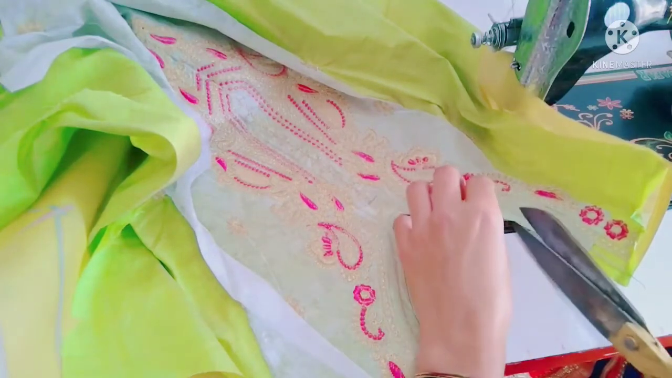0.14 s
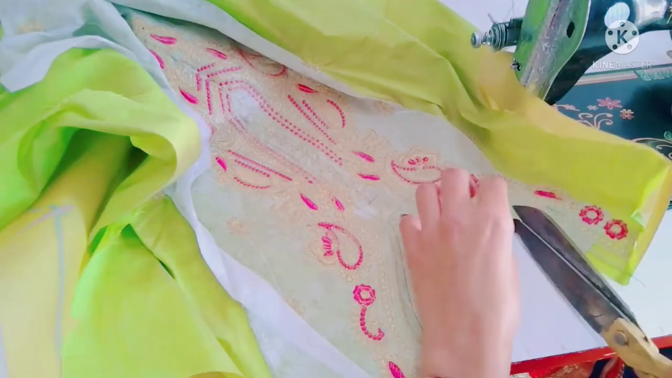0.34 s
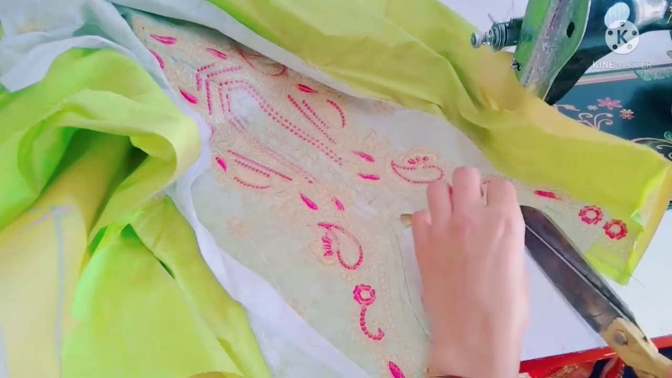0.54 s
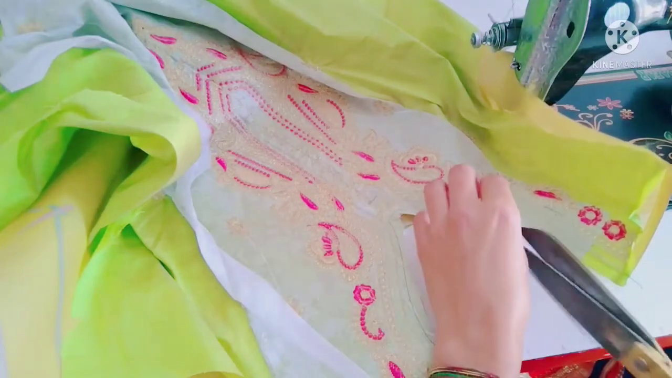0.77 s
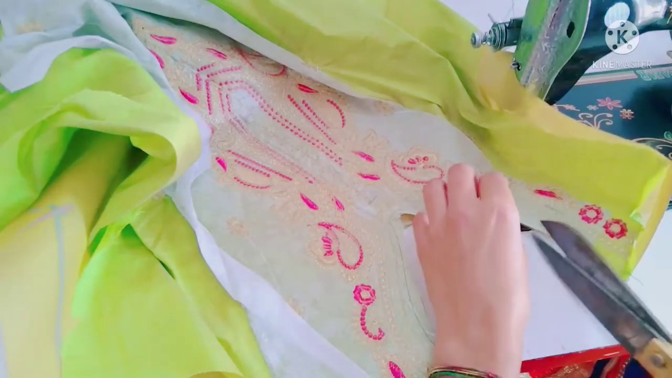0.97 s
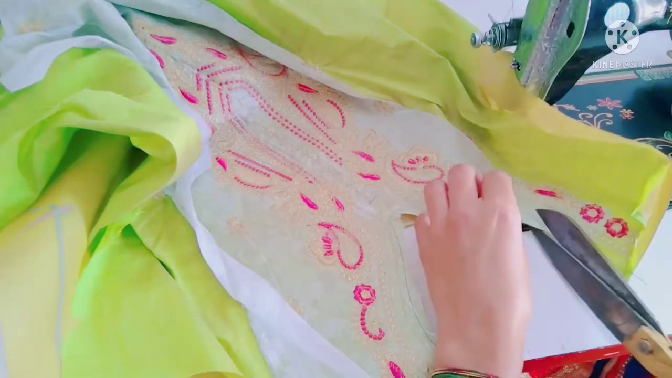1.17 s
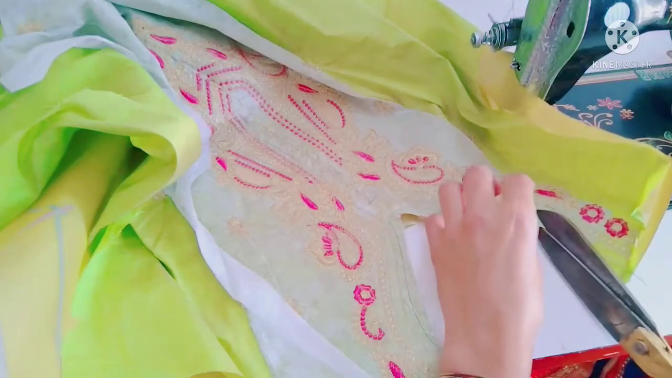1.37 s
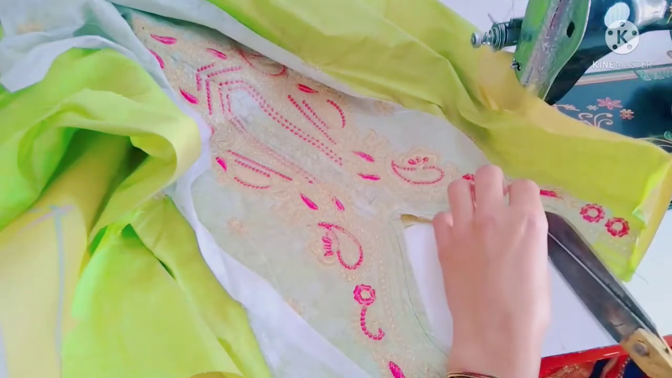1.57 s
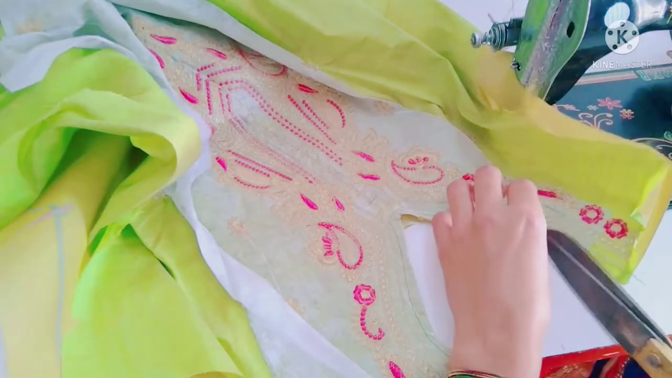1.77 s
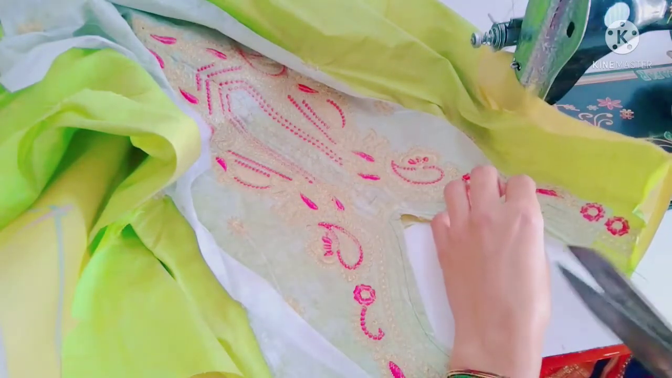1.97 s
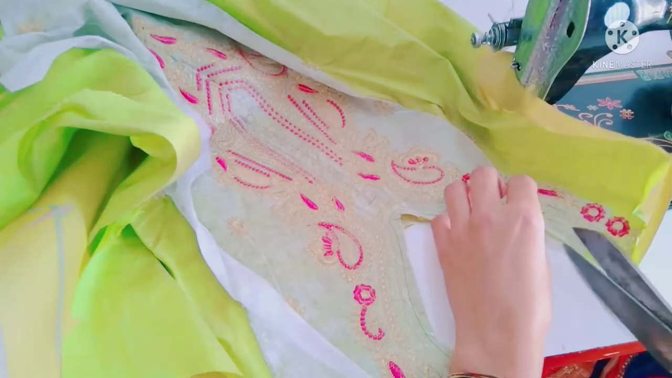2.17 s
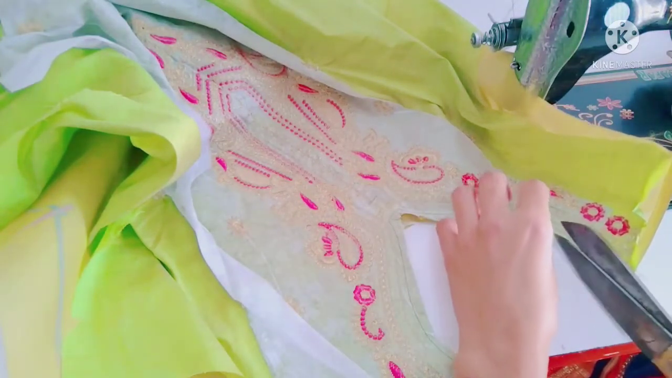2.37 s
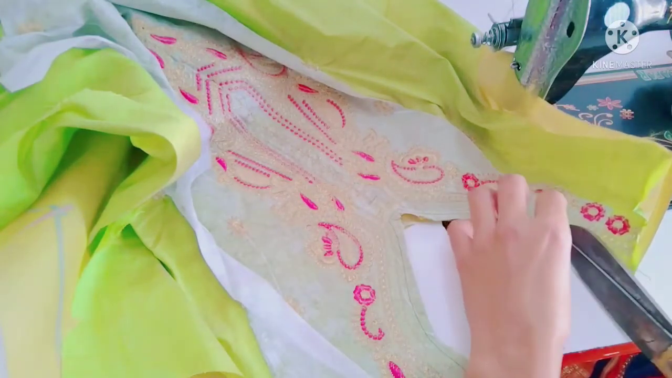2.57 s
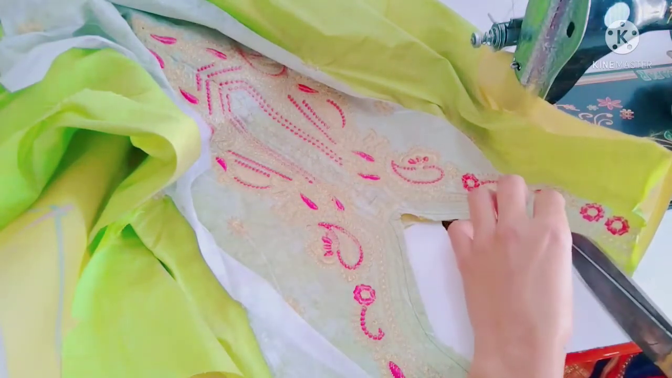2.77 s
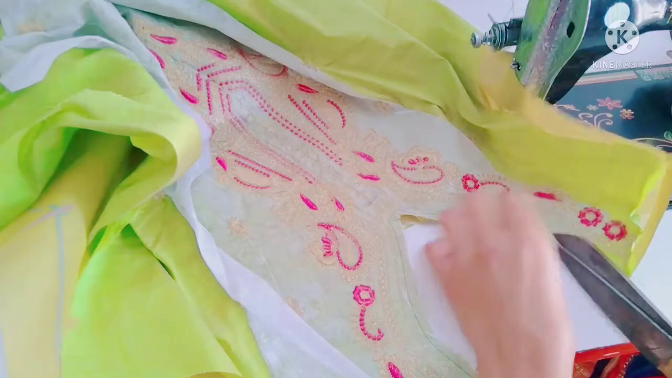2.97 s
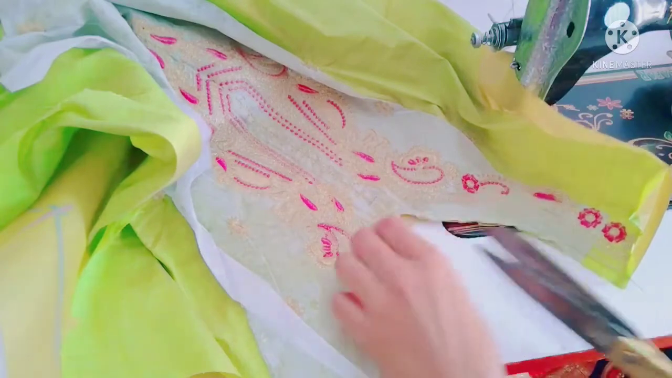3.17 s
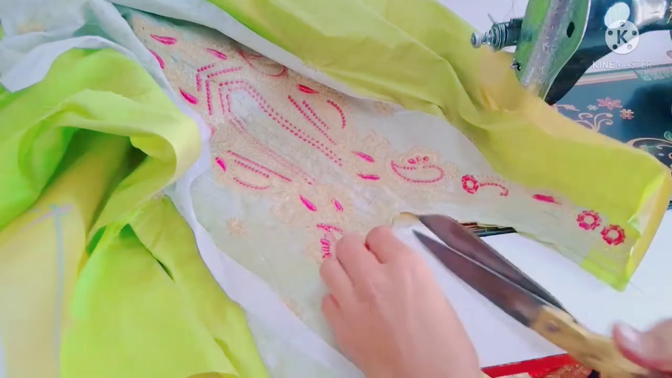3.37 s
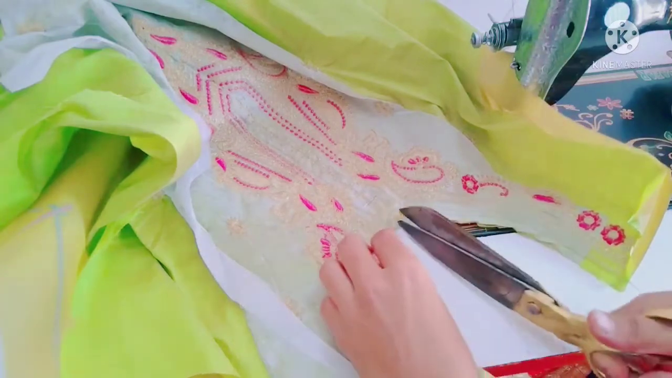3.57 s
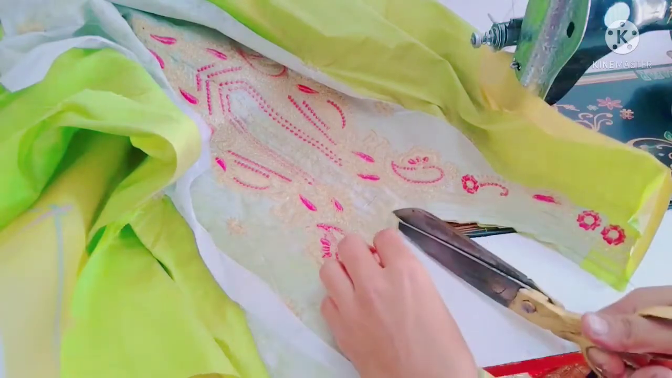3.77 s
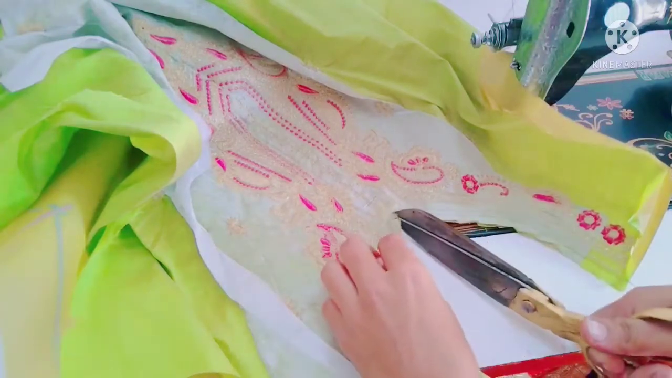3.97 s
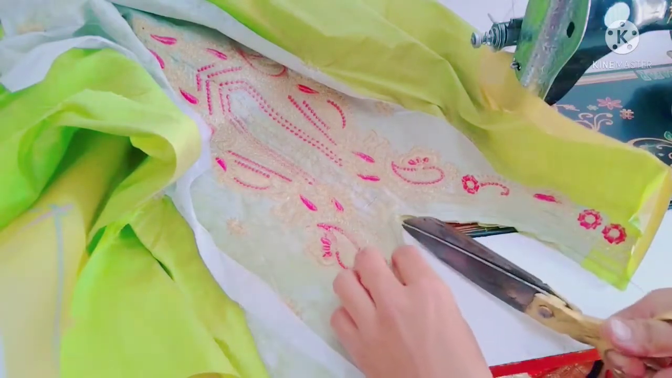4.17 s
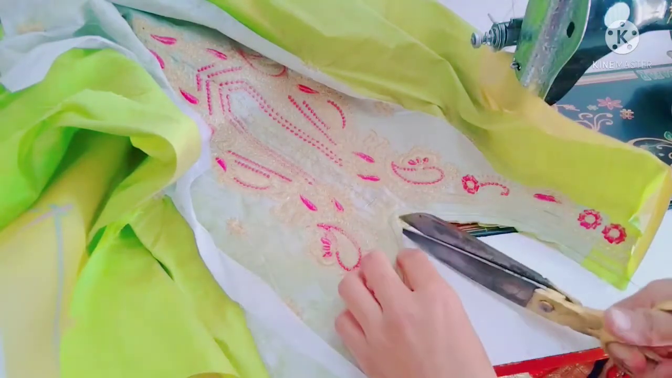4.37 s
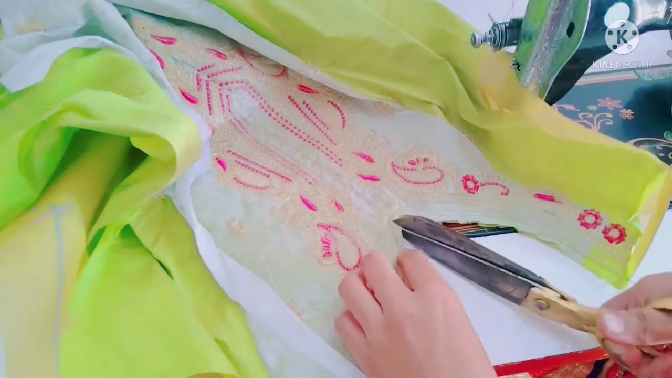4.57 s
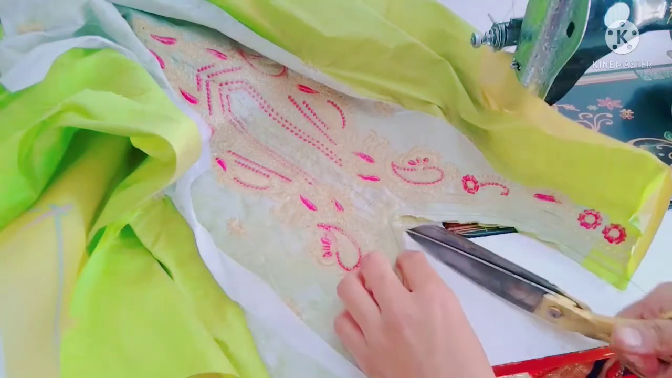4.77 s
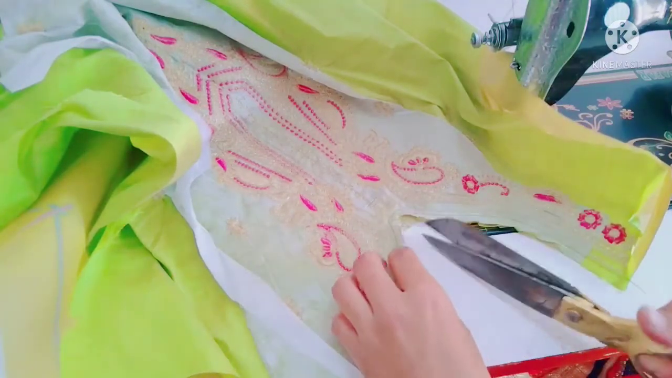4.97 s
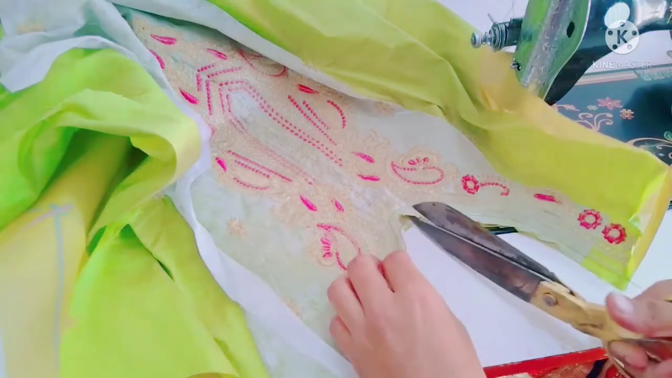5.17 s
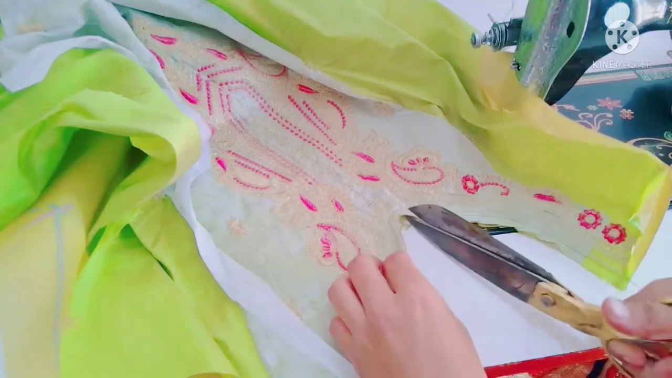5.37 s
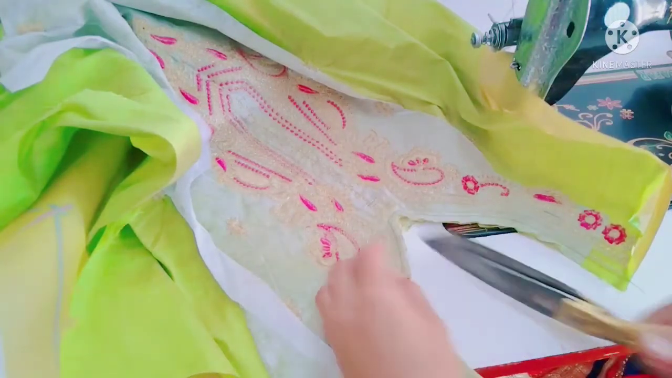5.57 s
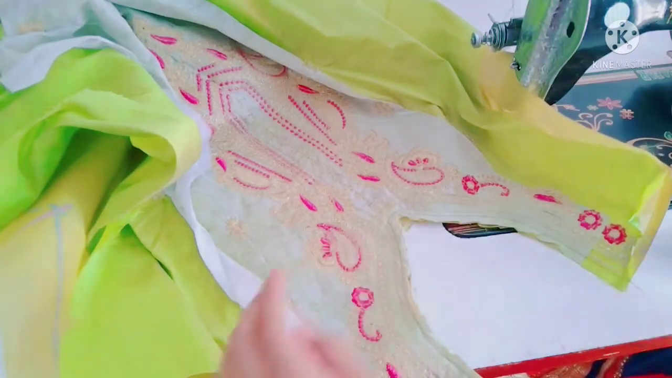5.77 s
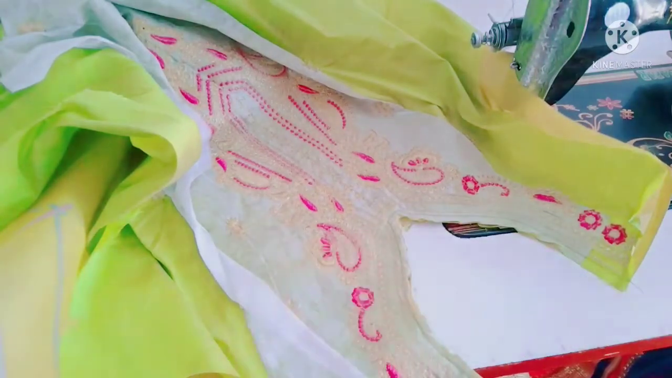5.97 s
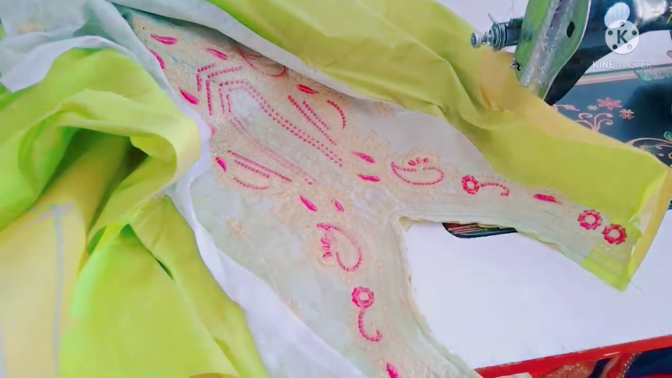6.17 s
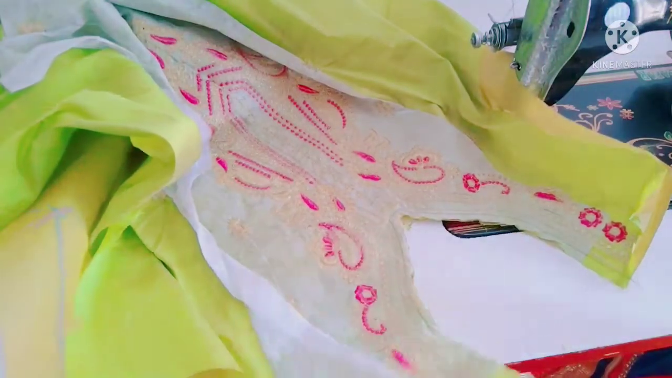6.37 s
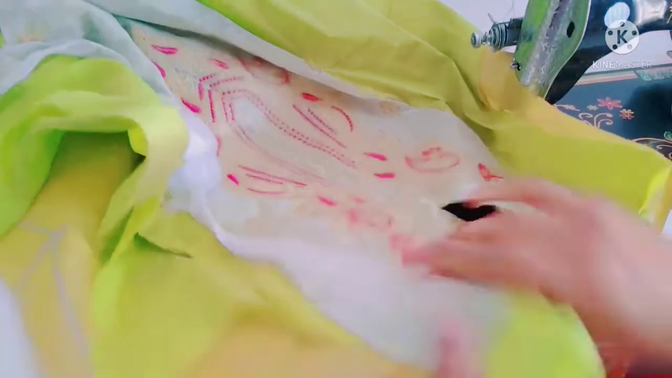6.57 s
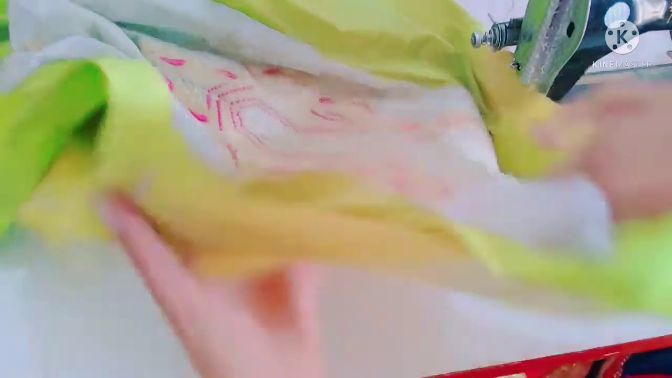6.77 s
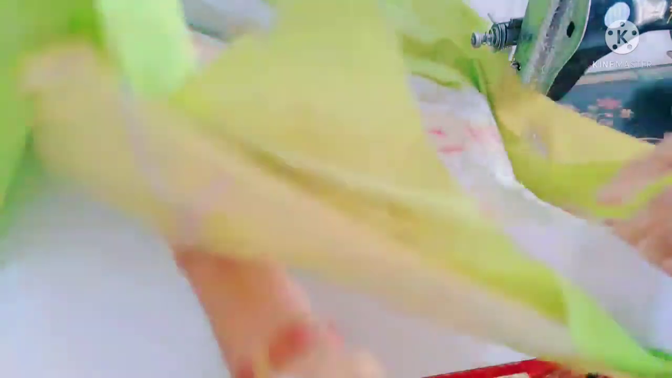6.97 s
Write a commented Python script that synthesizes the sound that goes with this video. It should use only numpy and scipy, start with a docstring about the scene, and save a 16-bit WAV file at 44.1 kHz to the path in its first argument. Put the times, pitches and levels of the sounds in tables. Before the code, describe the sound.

A crisp snip comes almost at once, another after a second, then more at uneven gaps, each a gritty tear and metallic snap with a woody thump. Cloth slides between cuts and something hollow is knocked. Soft birdsong, a faint accelerating motor and passing tones lie behind. Finally the shears clatter down and cloth swishes, all close-miked in a reflective indoor workspace.

```python
"""A rustle of cloth and a tick of steel are heard first; then heavy shears cut cloth on a wooden table in rasping
bursts, snap shut and at last drop and bounce. Something hollow is knocked; outside, a small engine gathers
speed, two birds call and a few faint tones pass. Noise shaped by spectra makes rasp, cloth and air; pushes
excite resonances of table, hollow body and exhaust; gliding sines make calls and tones. A hard room answers."""
import sys
import numpy as np
from scipy import signal
from scipy.fft import rfft, irfft, next_fast_len
from scipy.io import wavfile
from scipy.ndimage import uniform_filter1d, map_coordinates

SR = 44100
rng = np.random.default_rng(int(sys.argv[2]) if len(sys.argv) > 2 else 0)


def dump(signal):
    """Clip the signal to [-1, 1] and save it as 16-bit WAV at the path in sys.argv[1]."""
    limited = np.clip(np.atleast_2d(signal).T, -1, 1)
    pcm = np.round(limited * 32767).astype(np.int16)
    wavfile.write(sys.argv[1], SR, pcm)


N = 309582
T = np.arange(N) / SR  # time/s

# Table levels are nominal: the functions below add their own gains. Pan is left minus right.
# Cloth stirring between pulls: t/s, drag level/dB, rustle level/dB
CLOTH_STIR = [(0, -93, -73), (.9, -68, -73), (1.2, -62.5, -68.5), (2.2, -55.5, -67.5), (2.9, -62, -67),
              (3.3, -56.5, -69), (4, -52.5, -64.5), (5.2, -50.5, -66.5), (5.7, -58.5, -64), (6.3, -59, -48),
              (7.02, -53.5, -44)]
# Cloth pulled or shifted: t of full strength/s, hold/s, fade t60/s, drag level/dB, rustle level/dB
CLOTH_PULLS = [(0.413, 0.028, 0.38, -39.5, -53), (0.586, 0.047, 0.31, -38.5, -59),
               (1.343, 0.024, 0.27, -41.5, -56), (1.5, 0.018, 0.45, -35, -50.5),
               (1.608, 0.1, 0.61, -37, -54), (1.862, 0.055, 0.48, -47.5, -62.5),
               (2.386, 0.036, 0.43, -42, -70), (2.767, 0.017, 0.38, -58, -55.5),
               (3.086, .02, .4, -64, -58.5), (4.53, 0.044, .3, -45, -57.5), (4.716, .04, 0.47, -45, -59),
               (5.176, 0.026, .3, -48, -50), (5.894, 0.079, .2, -41.5, -39),
               (6.064, 0.017, 0.8, -33.5, -35.5), (6.492, 0.034, 0.84, -54, -41),
               (6.607, 0.025, .4, -64, -42), (6.776, 0.028, 0.49, -59, -43), (6.92, 0.05, .4, -59, -41.5)]
# Spectrum of dragging cloth: f/Hz, density/dB
DRAG_SPECTRUM = [(100, -34), (160, 4), (300, -1.5), (500, -1), (1100, -5.5), (1500, -11.5), (2500, -24.5)]
# Spectrum of swishing folds: f/Hz, density/dB
SWISH_SPECTRUM = [(700, -30), (1200, -1), (1700, -1), (2200, -2.5), (3500, -7), (5000, -13.5), (7000, -44)]
# Spectrum of rustling cloth: f/Hz, density/dB
RUSTLE_SPECTRUM = [(2060, -36), (3500, -19.5), (5060, -16), (6200, -13), (7460, -10.5), (8690, -3),
                   (11400, -14.5), (14900, -11), (16000, -37)]
# Spectrum of the air floor: f/Hz, density/dB
AIR_SPECTRUM = [(20, -26), (40, -4), (60, -1.5), (100, 0.5), (170, 1.5), (263, -9.5), (607, -13.5),
                (936, -9.5), (1370, -19), (5570, -27), (8360, -34), (14800, -36), (16000, -31)]
# Blades snapping or ticking: t/s, steel level/dB, table level re steel/dB, pan/dB
BLADE_SNAPS = [(0.024, -41, -4, 5), (0.1367, -53, -14, -5), (0.2815, -11, -5.5, -4.5),
               (0.4292, -38, 10, -7), (0.546, -43, 7, -1), (1.2332, -32, 5, 10), (1.3495, -19.5, -6.5, 0),
               (1.402, -32.5, -1, -3), (1.445, -36, -9, -1), (1.732, -42.5, -1, -8), (2.1901, -47.5, 10, 1),
               (2.2394, -42.5, -8, -1), (2.409, -36, -20, -2), (2.475, -26, -1.5, -5.5),
               (2.604, -38.5, -4, 9), (2.632, -35.5, -20, 6), (2.7668, -46, -12, -6),
               (3.1787, -45, -1.5, -1), (3.6054, -28, -34, 3), (4.3669, -14, -10, -3.5),
               (5.1609, -17.5, -2.5, -3), (5.3753, -44, 2, 2), (5.699, -37.5, -11, 1)]
# Spectrum of a snap: f/Hz, density/dB
SNAP_SPECTRUM = [(1500, -50), (2500, -43), (3400, -18), (4200, -6), (5500, -8.5), (7500, -10), (8500, 2),
                 (9800, 1.5), (11300, -14.5), (12300, 5), (13400, -13), (14500, 2), (16000, -39)]
# Resonances of the wooden table: f/Hz, width/Hz, level/dB
TABLE_MODES = [(146.3, 21, 1.5), (327.5, 107, -3.5), (470, 53.4, 1.5), (604, 58, 0.5), (762.6, 32, -0.5),
               (849, 8.8, -1), (1080, 178, -3.5), (1930, 770, -12)]
# Level bird calls: t of start/s, length/s, first f/Hz, last f/Hz, level/dB
BIRD_WHISTLES = [(.14, 0.055, 3620, 3600, -71), (3.205, 0.081, 2530, 2400, -59),
                 (3.46, 0.13, 2310, 2320, -60), (3.74, .08, 2510, 2550, -67),
                 (4.04, 0.15, 2600, 2375, -61.5)]
# Bursts of cutting: t/s, rasp level/dB, table level re rasp/dB, length/s, pan/dB
CUT_BURSTS = [(0.2, -23, -1, 0.045, -1.5), (0.242, -40, 10, 0.032, 21), (0.292, -21, -23, 0.0057, 16),
              (0.32, -35.5, -19, 0.017, 6), (1.226, -28.5, -3, 0.013, -4.5),
              (1.251, -21.5, -3.5, 0.021, 0.5), (1.272, -25, -0.5, 0.024, 3), (1.305, -34.5, 6.5, 0.026, 6),
              (2.309, -42.5, 0, 0.019, -4), (2.334, -23, -4, 0.019, 1.5), (2.377, -24, -13, 0.017, 1.5),
              (2.405, -28, 5, 0.0057, -13), (2.411, -39, 2, 0.043, -1), (3.55, -51, -16, 0.025, -4),
              (3.574, -38, -14, 0.0065, -4), (3.599, -23.5, -26, 0.0094, -7),
              (3.622, -27.5, -1.5, 0.0051, 2), (3.638, -37, -11, 0.012, -6), (4.284, -37.5, 3, 0.0082, -2),
              (4.297, -33, 0, 0.0048, -1), (4.31, -41, -3, 0.0091, 3), (4.331, -23, -8, 0.016, -0.5),
              (4.398, -37, -6, 0.0096, -9), (5.083, -33.5, 0, 0.0099, -1), (5.101, -26.5, -2.5, 0.02, 5)]
# Spectrum of parting threads: f/Hz, density/dB
RASP_SPECTRUM = [(1200, -23), (2000, -18.5), (4000, -25), (5200, -15), (6000, -6), (7000, -14), (7800, -14),
                 (9000, -10.5), (10400, 1), (11300, -13.5), (12300, -6), (14000, -9.5), (15200, -11),
                 (16000, -27)]
# Damped ringing of the blades: f/Hz, width/Hz, level/dB
BLADE_MODES = [(3280, 60, -13), (7930, 460, 4), (9130, 440, 3.5), (10970, 150, 1.5), (12060, 250, -2.5),
               (14400, 300, -13)]
# Engine loudness: t/s, level/dB
ENGINE_LEVEL = [(.9, -58), (1.2, -51.5), (1.5, -49), (2.2, -52), (2.6, -50.5), (3, -52.5), (3.75, -54),
                (4.1, -48.5), (4.6, -52), (5.2, -54), (5.5, -51.5), (5.75, -78)]
# Engine speed: t/s, firing rate/(1/s)
FIRING_RATE = [(.9, 7.57), (1.2, 12.88), (2.2, 14.17), (2.9, 14.87), (3.25, 14.96), (3.45, 17.01),
               (4.1, 19.02), (4.45, 20.68), (4.75, 20.19), (5.1, 22.41), (5.75, 24.52)]
# Resonances of exhaust pipe and window: f/Hz, width/Hz, level/dB
EXHAUST_MODES = [(69.4, 44, -8), (85.3, 30.4, 2), (126, 22.8, 0), (149.4, 46.5, -2), (292, 40, -11)]
# Faint far tones: t of start/s, length/s, first f/Hz, last f/Hz, level/dB
FAR_TONES = [(0.956, 0.041, 932, 920, -56.5), (1.06, 0.038, 934, 927, -53), (3.442, 0.1, 813, 890, -52.5),
             (3.6, 0.034, 865, 913, -51), (3.607, 0.11, 522, 505, -48.5), (4.01, 0.079, 610, 604, -54),
             (5.56, .2, 550, 555, -58.5)]
# Knocks on something hollow: t/s, body level/dB, steel level re body/dB, pan/dB, nominal contact time/ms
HOLLOW_KNOCKS = [(1.473, -29.5, -17, 7, 0.19), (2.987, -21.5, 3, -4.5, 0.068),
                 (3.021, -34.5, 2.5, -5, 0.071), (3.828, -34.5, -13, 5, 0.27), (3.849, -31, -15, 5, 0.32),
                 (4.346, -10.5, -9.5, -3, 0.051), (4.657, -25.5, -12.5, 0, 0.027)]
# Resonances of the hollow body: f/Hz, width/Hz, level/dB
HOLLOW_MODES = [(151, 18, 2.5), (363.8, 21, 5.5), (468, 133, -0.5), (680, 124, 0), (870, 69, 0),
                (1040, 73, -1), (1330, 47, 6.5), (1545, 86, -3), (1626, 84, 0), (1826, 64, 1.5),
                (2050, 210, -8.5), (2580, 670, -9.5), (3110, 980, -11.5)]
# Spectrum of rattling steel: f/Hz, density/dB
STEEL_SPECTRUM = [(880, -49), (1500, -16), (2160, -7.5), (2410, -11.5), (3480, -11.5), (4000, -14),
                  (6690, -12.5), (8240, 1.5), (10600, -12.5), (14800, -8), (16000, -51)]
# Arched bird calls: t of the top/s, level/dB
BIRD_CHIRPS = [(3.115, -52.5), (3.381, -50), (3.674, -49.5), (3.947, -50.5), (4.228, -51.5), (4.495, -52.5),
               (4.805, -55.5)]
# Engine orders that boom indoors: t of start/s, length/s, order, level/dB
ENGINE_BOOMS = [(3.804, .44, 5.05, -44.5), (4.28, 0.24, 5.1, -54), (4.604, 0.44, 7.4, -50.5),
                (4.9, 0.59, 5.1, -50.5)]
# Bounces of the dropped shears: t/s, table level/dB, steel level re table/dB, steel t60/s, pan/dB
SHEAR_DROPS = [(5.791, -22, 4, 0.017, -5), (5.805, -20, -15, 0.032, -14), (5.82, -29.5, 9.5, 0.041, 9),
               (5.834, -14.5, -1.5, 0.055, -11.5), (5.873, -28, 3, 0.055, -6), (5.911, -16, 0, 0.034, 4),
               (5.916, -18, 11, 0.049, 2), (5.972, -6.5, 2.5, 0.022, 23.5)]
# Decay of the room: f/Hz, t60/s
ROOM_DECAY = [(100, 1), (500, 0.49), (2000, 0.75), (8000, 0.54), (15000, 0.24)]
# Likeness of left and right in diffuse sound: f/Hz, correlation
CHANNEL_LIKENESS = [(60, 0.94), (130, 0.92), (290, 0.89), (640, 0.43), (1410, -0.41), (3100, 0.15),
                    (6820, -0.48), (15000, 0.05)]
# Treble balance of the two microphone ports: f/Hz, left re right/dB
PORT_BALANCE = [(60, -1.5), (700, -1.5), (2400, -3.5), (5000, -5), (7000, -12), (8500, -21), (10500, -7.5),
                (13000, -2.5)]

PULL_RISE_S = 0.31  # time for a pull to gain 60 dB
SWISH_DB, RUSTLE_PAN_DB = -4.5, -5  # swish re the mean of drag and rustle levels
SNAP_T60_S, KNOCK_T60_S = 0.015, 0.016  # decay of the steel rattle
FIRES_AT_S = 5.448  # one moment at which the engine fires
# Clatter re thump at the given firing rate, and its growth with speed
CLATTER_DB, CLATTER_DB_PER_FIRING, CLATTER_SPEED = 10, 1.67, 18.9
CHIRP_HZ, TOP_HZ = 3570, 15750  # top of the arched call; band limit
RIGHT_LAG_S = 12 / SR


def amp(db):
    """A level in decibels is twenty times the logarithm of amplitude."""
    return 10 ** (np.asarray(db) / 20)


def unit(x):
    """Division by the root mean square gives unit power."""
    return x / np.sqrt(np.mean(x ** 2) + 1e-20)


def along(points, hz):
    """Interpolates (f/Hz, value) points linearly in log frequency."""
    f, value = np.transpose(points)
    return np.interp(np.log(hz + 1), np.log(f + 1), value)


def curves(rows):
    """Interpolates each column after the time linearly at every sample."""
    s, *columns = np.transpose(rows)
    return [np.interp(T, s, column) for column in columns]


def wobble(rate):
    """A spline through random knots, rate per second, gives a smooth fluctuation."""
    knots = rng.standard_normal(int(N * rate / SR) + 4)
    return map_coordinates(knots, [T * rate])


def filtered(x, response):
    """A linear system multiplies the spectrum of x by its complex response."""
    m = next_fast_len(N + SR // 2)
    hz = np.fft.rfftfreq(m, 1 / SR)
    return irfft(rfft(x, m) * response(hz), m)[..., :N]


def coloured(x, spectrum):
    """Spectral shaping scaled so that white noise keeps its power."""
    power = np.mean(amp(along(spectrum, np.linspace(0, SR / 2, 2000))) ** 2)
    return filtered(x, lambda hz: amp(along(spectrum, hz)) / np.sqrt(power))


def resonant(x, modes):
    """Damped second-order resonances, summed with alternating sign, ring under the excitation x."""
    def response(f):
        total = 0
        for k, (centre, width, db) in enumerate(modes):
            mode = 1j * f * width / (centre * centre - f * f + 1j * f * width)
            total = total + (-1) ** k * amp(db) * mode
        return total
    return filtered(x, response)


def diffuse(pair):
    """Mid and side mixed from unrelated signals set the correlation of left and right at each frequency."""
    def mid_side(hz):
        turn = np.arccos(np.clip(along(CHANNEL_LIKENESS, hz), -1, 1)) / 2
        return np.array([np.cos(turn), np.sin(turn)])
    mid, side = filtered(pair, mid_side)
    return np.array([mid + side, mid - side])


def fibres(grain_db, rate, channels=1):
    """Noise of unit power, modulated in level, models friction that varies from fibre to fibre."""
    return unit(np.array([rng.standard_normal(N) * amp(grain_db * wobble(rate)) for _ in range(channels)]))


def add(out, s, x, pan_db):
    """Superposes x at time s with a level difference between the channels."""
    part = out[:, round(s * SR):][:, :len(x)]
    part += amp([[pan_db / 2], [-pan_db / 2]]) * x[:part.shape[1]]


def swell(s, length):
    """A half sine is a smooth rise and fall over one note."""
    return np.abs(np.sin(np.pi * np.clip((T - s) / length, 0, 1)))


def right_late(x):
    """Sound from the shears reaches the left port first: a phase ramp delays the right channel."""
    lag = np.array([[0], [RIGHT_LAG_S]])
    return filtered(x, lambda hz: np.exp(-2j * np.pi * hz * lag))


def floor_of_air():
    """Gently fluctuating broadband noise forms a diffuse floor."""
    return amp(-54.5) * coloured(diffuse(fibres(0.42, 24, channels=2)), AIR_SPECTRUM)


def cloth():
    """Stick-slip friction in coarse grains excites the table modes; folds swish and rustle above."""
    level_db = np.array(curves(CLOTH_STIR))
    for s, hold, fade, *db in CLOTH_PULLS:
        rise_and_fade = np.minimum((T - s) / PULL_RISE_S, (s + hold - T) / fade)
        shape_db = 60 * np.minimum(0, rise_and_fade)
        level_db = np.maximum(level_db, np.array(db)[:, None] + shape_db)
    drag_db, rustle_db = level_db
    swish_db = level_db.mean(0) + SWISH_DB
    grains = diffuse(fibres(2, 70, channels=2))
    drag = unit(coloured(resonant(grains, TABLE_MODES[1:]), DRAG_SPECTRUM))
    swish = coloured(fibres(1.66, 150, channels=2), SWISH_SPECTRUM)
    rustle = coloured(fibres(1.5, 250, channels=2), RUSTLE_SPECTRUM)
    rustle = rustle * amp(RUSTLE_PAN_DB * np.array([[.5], [-.5]]))
    return (amp(drag_db + 2.05 * wobble(22)) * drag
            + amp(swish_db + 3.4 * wobble(12)) * swish
            + amp(rustle_db + 0.77 * wobble(30)) * rustle)


def blows(events, spectrum, modes, body_gain_db, rise, chatter_db):
    """An impact excites a dying steel rattle and a ringing body, with a chatter of loose contact.

    Events: t/s, steel level/dB, body level/dB, steel t60/s, pan/dB, contact time/ms."""
    steel, push, t = np.zeros((2, N)), np.zeros((2, N)), T[:SR // 8]
    noises = rng.standard_normal((len(events), 2, len(t)))
    for (s, steel_db, body_db, t60, pan_db, ms), (rattle, loose) in zip(events, noises):
        decay = amp(steel_db - 60 * t / max(t60, .003))
        add(steel, s, decay * (1 - np.exp(-t / rise)) * rattle, pan_db)
        u = t * 1000 / max(ms, .03)  # time in contact times; the pulse peaks at u = 1
        chatter = amp(chatter_db - 60 * t / 0.055) * loose
        add(push, s, amp(body_db + body_gain_db) * (u * np.exp(-u) + chatter), pan_db / 4)
    return coloured(steel, spectrum) + resonant(push, modes)


def snaps():
    """Closing blades collide: a brief steel rattle, with the impulse passed to the table."""
    events = [(s, db, db + table_db, SNAP_T60_S, pan, .1) for s, db, table_db, pan in BLADE_SNAPS]
    return blows(events, SNAP_SPECTRUM, TABLE_MODES, body_gain_db=17, rise=0.00024, chatter_db=-8.5)


def calls(notes):
    """Integrating a gliding, slightly wavering frequency gives the phase of each sine."""
    out = np.zeros(N)
    for s, length, first_hz, last_hz, db in notes:
        hz = np.interp(T, [s, s + length], [first_hz, last_hz]) * (1 + 0.00593 * wobble(40))
        level = np.sqrt(2) * amp(db + 1.6 * wobble(45)) * swell(s, length)
        out += level * np.sin(2 * np.pi * np.cumsum(hz) / SR)
    return out


def cutting():
    """Parting threads are noise bursts that excite the blade modes; the same strokes shake the table."""
    edge, push, t = np.zeros((2, N)), np.zeros((2, N)), T[:SR // 5]
    for s, db, table_db, length, pan_db in CUT_BURSTS:
        onset = 1 - np.exp(-(t / .005) ** 2)
        stroke = onset * amp(-60 * np.clip(t - length, 0, 1) / .02)  # t60 of 0.02 s after the burst
        add(edge, s - .002, amp(db - 7.5) * stroke, pan_db)
        add(push, s, amp(db + table_db + 10.0) * stroke, 0)
    threads = edge * fibres(2.6, 500)
    rasp = amp(-1.5) * coloured(threads, RASP_SPECTRUM)
    ring = amp(6.0) * resonant(threads, BLADE_MODES)
    shake = resonant(push * fibres(1.0, 150), TABLE_MODES)
    return rasp + ring + filtered(shake, lambda hz: 1 / (1 + (hz / 1500) ** 4))


def engine():
    """Each firing is an impulse of uneven strength that rings the exhaust, with a tick of valve clatter."""
    (rate,), (db,) = curves(FIRING_RATE), curves(ENGINE_LEVEL)
    on = (T > ENGINE_LEVEL[0][0]) & (T < ENGINE_LEVEL[-1][0])
    firings = np.cumsum(rate * on) / SR
    count = np.floor(firings - firings[round(FIRES_AT_S * SR)])
    fire = np.abs(np.diff(count, append=0)).clip(0, 1) * on * amp(1.2 * wobble(40))
    # walls and microphone drop the deepest bass
    thump = filtered(resonant(fire, EXHAUST_MODES), lambda hz: 1 / (1 + (60 / (hz + 1)) ** 6))
    local_power = np.abs(uniform_filter1d(thump ** 2, SR // 4))
    thump = thump / np.sqrt(local_power + 1e-12) * on
    tick_decay = amp(-60 * T[:SR // 10] / .04)
    tick = signal.fftconvolve(np.roll(fire, round(.002 * SR)), tick_decay)[:N]  # 2 ms after firing
    tick = tick * rng.standard_normal(N)
    clatter = resonant(tick, [(926, 520, 2), (2300, 240, -0.5), (2840, 185, -2.0)])  # f/Hz, width/Hz, dB
    clatter_db = CLATTER_DB + CLATTER_DB_PER_FIRING * (rate - CLATTER_SPEED)
    return amp(db) * (thump + amp(clatter_db) * clatter)


def knocks():
    """A short contact force excites the modes of a hollow body."""
    events = [(s, db + steel, db, KNOCK_T60_S, *rest) for s, db, steel, *rest in HOLLOW_KNOCKS]
    return blows(events, STEEL_SPECTRUM, HOLLOW_MODES, body_gain_db=23, rise=0.00028, chatter_db=-17.5)


def chirps():
    """Frequency modulation by a raised cosine makes one arched call, up and down again, repeated."""
    out, u = np.zeros(N), np.linspace(-1, 1, round(.084 * SR))
    pitch = CHIRP_HZ * (1 - .085 * (1 - np.cos(np.pi * u)))
    call = signal.windows.tukey(len(u), .3) * np.sin(2 * np.pi * np.cumsum(pitch) / SR)
    for s, db in BIRD_CHIRPS:
        out[round(s * SR) - len(u) // 2:][:len(u)] += amp(db) * call
    return out * amp(1.5 * wobble(70))


def booms():
    """Single orders, sines at multiples of the firing rate, swell for a while as an indoor boom."""
    firings = np.cumsum(curves(FIRING_RATE)[0]) / SR
    out = np.zeros(N)
    for s, length, order, db in ENGINE_BOOMS:
        level = amp(db + 2.4 * wobble(17)) * np.sqrt(2 * swell(s, length))
        out += level * np.sin(2 * np.pi * order * firings)
    return out


def drops():
    """Successive impacts of the bouncing shears rattle the steel and ring the table."""
    events = [(s, db + steel, db, *rest, .06) for s, db, steel, *rest in SHEAR_DROPS]
    return blows(events, STEEL_SPECTRUM, TABLE_MODES[1:], body_gain_db=22.5, rise=0.0017, chatter_db=-17.5)


def room(x):
    """Reverberation decays at a rate set by frequency; each quarter second of sound gets a new noise tail."""
    out, step = np.zeros((2, N + SR * 2)), SR // 4
    for k in range(0, N, step):
        hz, t, z = signal.stft(rng.standard_normal((2, SR)), SR, nperseg=256)
        decay = amp(-60 * t / along(ROOM_DECAY, hz)[:, None])
        tail = signal.istft(z * decay, SR, nperseg=256)[1][:, :SR]
        wet = signal.fftconvolve(x[None, k:k + step], tail / np.linalg.norm(tail[0]), axes=1)
        out[:, k + 200:][:, :wet.shape[1]] += wet  # 200 samples of delay before the tail
    return diffuse(out[:, :N])


def scene():
    """Direct sounds, the answer of the room and the floor of air superpose."""
    snips, fall = right_late(cutting() + snaps()), right_late(drops())
    taps, motor = knocks(), engine()
    birds_and_tones = chirps() + calls(BIRD_WHISTLES) + calls(FAR_TONES)
    echo = room(amp(-6.0) * snips.mean(0) + amp(-4.5) * fall.mean(0) + amp(-4) * taps.mean(0)
                + amp(-10) * motor + amp(-7.5) * birds_and_tones)
    direct = snips + fall + taps + motor + booms() + birds_and_tones * amp([[-3], [0]])
    return direct + echo + cloth() + floor_of_air()


def record(dry):
    """Two ports with unequal treble, rounding of peaks at full scale and a steep low-pass filter."""
    def ports(hz):
        left = amp(along(PORT_BALANCE, hz))
        return np.array([left, hz ** 0]) * 2 / (1 + left)
    x = filtered(dry, ports)
    x = x / (1 + np.abs(x) ** 8) ** (1 / 8)
    return filtered(x, lambda hz: 1 / (1 + (hz / TOP_HZ) ** 120))


dry = scene()
out = record(dry)
dump(out)
```